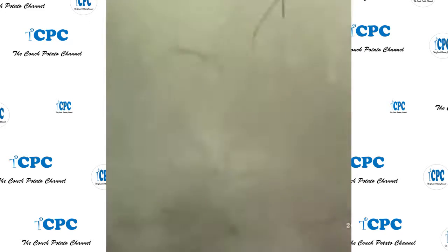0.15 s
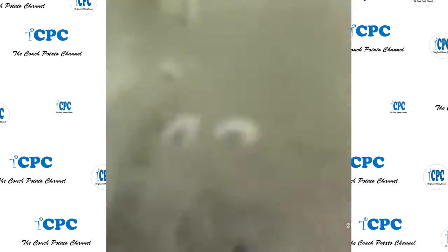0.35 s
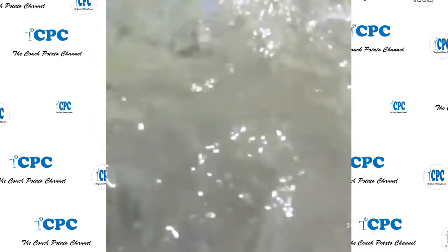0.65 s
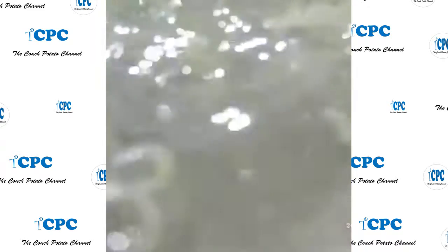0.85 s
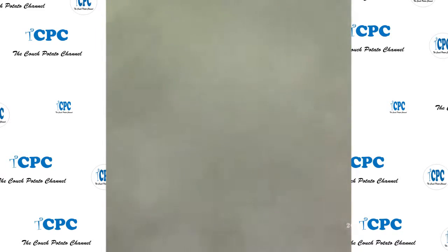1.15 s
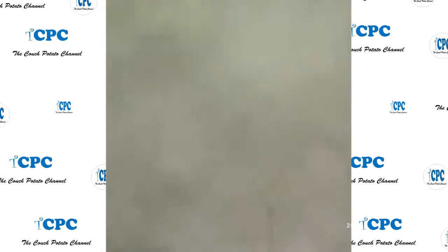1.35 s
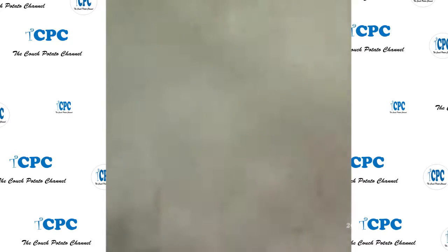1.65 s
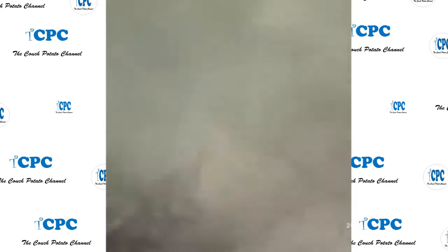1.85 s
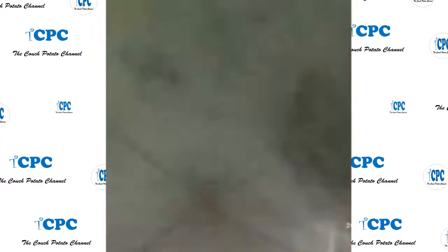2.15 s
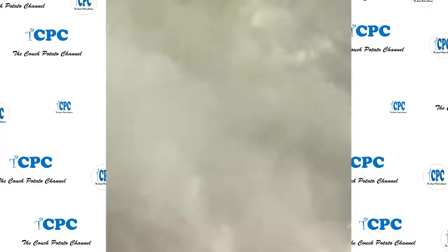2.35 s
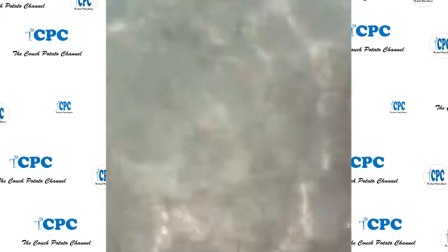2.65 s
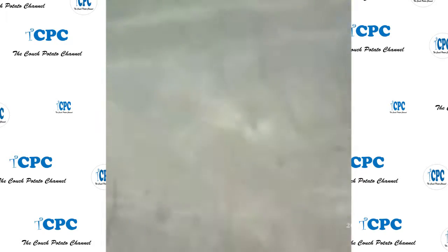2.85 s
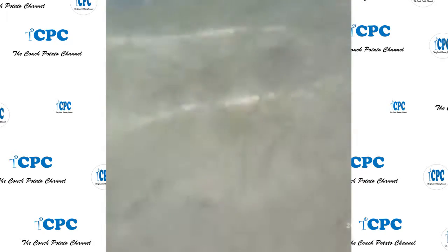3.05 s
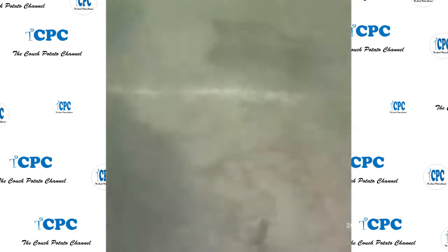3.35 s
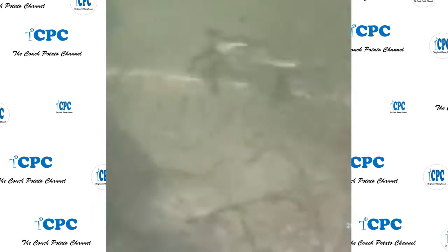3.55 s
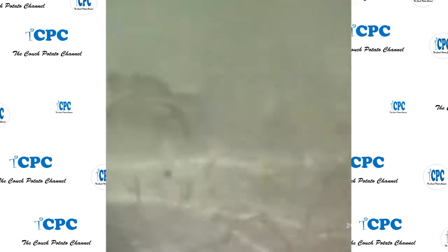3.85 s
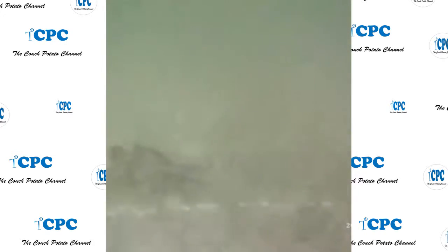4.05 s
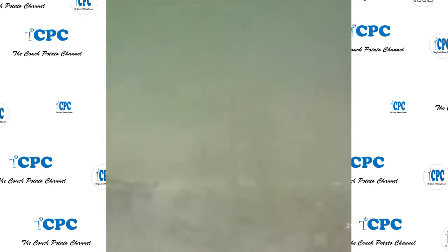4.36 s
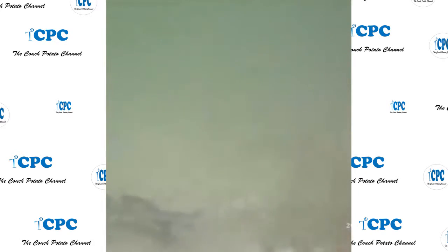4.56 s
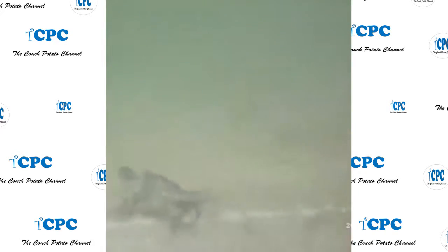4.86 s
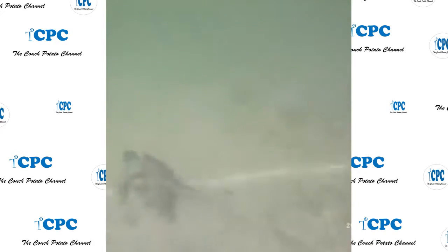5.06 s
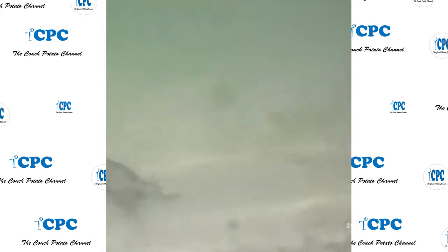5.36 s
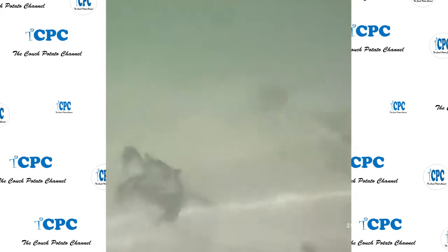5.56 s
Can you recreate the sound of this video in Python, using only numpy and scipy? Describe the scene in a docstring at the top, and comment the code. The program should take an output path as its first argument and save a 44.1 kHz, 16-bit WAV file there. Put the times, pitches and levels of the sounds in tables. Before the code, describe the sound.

A cased camera plunges in choppy shallow water: loud ringing bubbles, hollow plastic knocks and spitting splashes, thinning to faint plinks over dull hush.

```python
"""A camera in a sealed plastic case dips in and out of choppy shallow water.
First come close-packed washes: trapped air rings, knocks the shell and spits as it bursts. Among them
the case goes under, and a cloud of fine bubbles rushes by, its resonances sinking.
Three more groups of washes follow, with soft gurgling between; the nearest bubbles overload the microphone.
Late on the rings grow sparse and faint, and a last weak wash passes over a dull steady hush."""
import sys
import numpy as np
from scipy import signal
from scipy.fft import rfft, irfft
from scipy.io import wavfile
from scipy.ndimage import uniform_filter1d

SR = 44100
rng = np.random.default_rng(int(sys.argv[2]) if len(sys.argv) > 2 else 0)


def output_pcm(signal):
    """Save a mono or channel-first signal as 16-bit PCM at the path in sys.argv[1].

    Samples are clipped to [-1, 1] before scaling.
    """
    pcm = np.clip(np.atleast_2d(signal).T, -1, 1) * 32767
    wavfile.write(sys.argv[1], SR, np.round(pcm).astype(np.int16))


N = 251370
T = np.arange(N) / SR  # time in seconds

# big bubbles at the case: start_s, level_db, pitch_hz (at the start), ring_cycles (to fall 60 dB)
NEAR_BUBBLES = [(.0852, -5, 3940, 33), (.1306, -4.5, 3200, 50), (.1375, -6.5, 690, 4.2),
                (.1515, 1.5, 1642, 74), (.159, -10, 342, 11), (.1618, -0.5, 1357, 29),
                (.1767, 5.5, 860, 6.7), (.1891, 1, 1543, 38), (.2248, -2, 850, 13), (.23, -15.5, 477, 14),
                (.232, 3, 1538, 55), (.252, -7, 920, 17), (.2702, -7, 1120, 11), (.2993, -2, 3430, 47),
                (.3379, -11.5, 950, 5.3), (.3571, -6.5, 3800, 12), (.3685, 5.5, 1188, 55),
                (.4102, -1, 1780, 80), (.454, 3.5, 1692, 73), (.5984, -10.5, 1420, 20),
                (.983, -2, 2980, 7.9), (.9995, -4.5, 3420, 62), (1.0182, 1, 3260, 32),
                (1.0426, -5, 3220, 31), (1.1364, -7.5, 1960, 40), (1.203, -6, 1387, 44),
                (1.2244, -10.5, 1857, 100), (1.2355, -11, 1896, 70), (1.2629, -9, 1790, 20),
                (1.2917, -8.5, 2026, 30), (1.3636, -15, 2380, 37), (1.4052, 0.5, 1687, 17),
                (1.9714, -12.5, 1548, 80), (1.9869, -12, 1670, 29), (2.001, -5.5, 1340, 23),
                (2.0201, -12, 1560, 17), (2.0312, -3.5, 1640, 19), (2.0445, -12, 4190, 12),
                (2.0634, -12, 1647, 8.7), (2.0955, -10.5, 1010, 22), (2.097, -25.5, 384, 45),
                (2.122, -16, 1090, 18), (2.1918, -11, 1284, 20), (2.2252, -8.5, 1485, 18),
                (2.2346, -4, 2860, 24), (2.3051, -13.5, 1664, 55), (2.476, -3.5, 1960, 73),
                (2.478, -11, 1250, 107), (2.5285, -5, 1970, 36), (2.5598, -4.5, 4050, 73),
                (2.6149, -1, 2002, 55), (2.618, -1, 1264, 49), (2.6332, 3, 1687, 41), (2.64, -3, 3070, 59),
                (2.653, -7.5, 1370, 19), (2.6647, -6, 3370, 47), (3.1948, 2, 3075, 28),
                (3.228, -19.5, 567, 21), (3.2293, -1, 1930, 17.5), (3.2593, -11, 4110, 106),
                (3.2987, -7.5, 4130, 9.3), (3.3348, -15, 1300, 35), (3.4409, -15, 1031, 51),
                (3.4698, -17, 1610, 91), (3.5611, -13, 1700, 8.2), (3.6336, -14, 950, 27),
                (3.6622, -3.5, 894, 28), (3.8461, -8.5, 1520, 20), (3.8647, -15.5, 900, 39),
                (3.9102, -20.5, 1406, 53), (3.971, -33.5, 770, 32), (4.1619, -37.5, 881, 29),
                (4.4152, -19.5, 1556, 77), (4.4315, -13, 1620, 53), (4.503, -23, 1984, 27),
                (4.5854, -9, 1690, 46), (4.712, -38, 709, 68), (5.1838, -26, 797, 12),
                (5.2392, -27, 1110, 52), (5.2866, -30, 806, 37), (5.3127, -33, 1160, 47),
                (5.5568, -27.5, 950, 32)]
# ringing modes of the plastic shell: pitch_hz, t60_s, level_db (relative)
SHELL_MODES = [(445, 0.02, -17.5), (809, 0.019, -5.5), (1200, 0.045, -7), (1670, 0.032, 2),
               (1810, 0.013, 3.5), (3220, 0.0078, 6.5), (4065, 0.018, -5.5), (5460, 0.0098, -4)]
# films of water that burst on the case: start_s, level_db (tick, knock and splash are set against it)
SPRAY_BURSTS = [(.085, -7), (.161, -24), (0.189, -16), (.232, -19), (.402, -18), (0.4536, -10),
                (0.8669, -17.5), (0.982, -7), (1.0184, -33), (1.057, -3.5), (1.1034, -16), (1.1545, -8.5),
                (1.18, -21), (1.3255, -7), (1.3806, -4.5), (1.9782, -17), (2.0448, -16.5), (2.18, -21),
                (2.2056, -21), (2.5598, -16), (2.6342, -23), (2.7157, -7), (3.1948, -7), (3.2463, -5.5),
                (3.2987, -14), (3.431, -4.5), (3.4904, -5), (3.732, -31.5), (3.8461, -42), (4.162, -40),
                (4.4315, -33), (4.5854, -34.5), (4.94, -42), (5.101, -35), (5.1852, -31)]
# washes of water over the case: start_s, length_s, churn_db, spray_db, pitch_hz (typical bubble)
WASHES = [(.005, 0.066, -43.5, -54, 900), (0.082, .06, -23, -28, 2600), (.15, .06, -25, -42, 1000),
          (.25, 0.087, -36, -55, 1200), (0.365, .12, -22.5, -44.5, 1700), (0.552, .33, -47.5, -47.5, 1250),
          (.982, 0.025, -34.5, -37.5, 2480), (1.195, .22, -38, -52, 1900), (1.976, .06, -28, -60, 1400),
          (2.118, .14, -47.5, -62.5, 1400), (2.348, .33, -34.5, -58.5, 1600),
          (3.195, 0.074, -42, -40.5, 1650), (3.296, 0.082, -30.5, -46, 1590),
          (3.41, 0.075, -32, -38.5, 1400), (3.627, 0.045, -39, -80, 1100), (3.954, .17, -62, -85, 870),
          (5.256, .44, -51.5, -72, 1000)]
# level of the bubble cloud as the case goes under: time_s, level_db
PLUNGE_LEVEL = [(.40, -43), (.445, -28.5), (.51, -29), (.57, -35), (0.621, -44.5), (.8, -47.5), (.95, -72)]
# strong sinking resonances of the bubble cloud: start_s, length_s, start_hz, end_hz, level_db (peak)
SINKING_RESONANCES = [(.46, .12, 1080, 790, -29), (.495, .1, 1330, 860, -25), (.54, .08, 1480, 1060, -23),
                      (.46, .1, 1800, 1440, -26)]
# tone colour of the bubble cloud: freq_hz, level_db (relative)
CLOUD_COLOUR = [(200, -29), (700, -5), (1150, -2.5), (1700, -2.5), (2200, -0.5), (2650, 0.5), (3000, -9),
                (3580, 1.5), (4200, -9.5), (4800, -25), (6300, -20.5), (10500, -32), (13000, -71)]
# bright colour of fizz and ticks: freq_hz, level_db (relative)
SPRAY_COLOUR = [(1500, -25), (2600, -6.5), (3400, 4.5), (4200, 1), (4900, -3.5), (6000, 3), (7500, -4),
                (9500, -15.5), (12000, -21), (15500, -55.5)]
# rounder colour of murmur and splashes: freq_hz, level_db (relative)
SPLASH_COLOUR = [(120, -25.5), (330, -6.5), (600, 3.5), (880, 0.5), (1050, -6), (1630, 5.5), (2100, -7),
                 (2500, 1), (3300, -12.5), (4200, -17), (5000, -25), (12000, -64)]
# dull colour of the noise inside the case: freq_hz, level_db (relative)
HUSH_COLOUR = [(24, -58), (40, -50.5), (138, -21), (270, -10), (392, -4), (454, -4.5), (490, -5),
               (866, -3.5), (1320, -6), (1780, -5.5), (3650, -17), (7310, -35), (8070, -49.5),
               (8910, -35.5), (15000, -54.5)]

HUSH_DB = -56
TOP_HZ = 15400  # nothing much is heard above
WASH_ATTACK_S, CHURN_RELEASE_S, SPRAY_RELEASE_S = 0.0092, 0.027, 0.038  # time constants
DRAIN_DB, DRAIN_S = -20, .085  # slow trickle after a wash: level and time constant
CALM_CHURN_DB, CALM_SPRAY_DB = -65.5, -77.5  # lowest levels, between washes
POPS_PER_S = 32  # small bubbles that reach the case during a wash
SPITS_PER_S = 45  # small bursts of spray, during a wash and its drips
DRIP_S = 0.14  # bursts go on this long after a wash


def bubbles(rows, knock_db=-8, damped_db=2, tick_db=-31, tick_db_per_octave=10, tick_t60_s=0.017,
            splash_db=-12, splash_t60_s=.055, daughter_db=-20, daughter_db_per_db=2.0):
    """Bubbles right at the case: each gives a ring, a knock on the shell, a rough splash and a wet tick."""
    out, ticks, splashes = np.zeros(N), np.zeros(N), np.zeros(N)
    for start_s, level_db, pitch_hz, cycles in rows:
        t60_s = cycles / pitch_hz
        # long rings also take longer to swell
        ring = bubble(pitch_hz, t60_s, rise=0.063, swell_s=0.00083 + .04 * t60_s)
        add(out, start_s, undb(level_db) * ring)
        # a bubble pressed against the shell rings for fewer cycles and knocks harder
        shell_db = level_db + knock_db + damped_db * np.log2(40 / cycles)
        # big, low bubbles excite mainly the low modes
        blow = knock(scatter_db=5, detune=0.039, corner_hz=1.54 * pitch_hz)
        add(out, start_s + .0005, undb(shell_db) * blow)
        add(splashes, start_s - .0005, undb(shell_db + splash_db) * hiss(splash_t60_s))
        # the smaller the bubble, the stronger its tick
        sharp_db = level_db + tick_db + tick_db_per_octave * np.log2(pitch_hz / 1700)
        add(ticks, start_s - .0005, undb(sharp_db) * hiss(tick_t60_s))
        # only violent bubbles shed loud daughters
        add(out, start_s, daughters(daughter_db + daughter_db_per_db * level_db))
    return out + colour(ticks, SPRAY_COLOUR) + colour(splashes, SPLASH_COLOUR)


def small_bubbles(above_churn_db=9, range_db=11, octaves=1.3, cycles=45):
    """Rows of small bubbles that each wash carries to the case at random, louder in rougher water."""
    rows = []
    chances = rng.random((len(WASHES), 60, 4))
    for (start_s, length_s, churn_db, _, pitch_hz), chance in zip(WASHES, chances):
        for when, strength, size, damping in chance[:int(POPS_PER_S * length_s)]:
            level_db = churn_db + above_churn_db + range_db * strength
            own_hz = pitch_hz * 2 ** (octaves * (size - .4))
            rows.append((start_s + length_s * when, level_db, own_hz, cycles * (.5 + damping)))
    return rows


def bubble(pitch_hz, t60_s, rise, swell_s):
    """A pinched-off bubble swells into a decaying ring; a positive rise lifts the pitch as it nears the surface."""
    t = T[:int((t60_s + 2 * swell_s) * SR) + 2]
    gliding_hz = pitch_hz * (1 + rise * t / t60_s)
    phase = 2 * np.pi * np.cumsum(gliding_hz) / SR
    onset = np.sin(np.pi / 2 * np.minimum(t / swell_s, 1)) ** 2
    return onset * fade(np.maximum(t - swell_s, 0), t60_s) * np.sin(phase)


def knock(scatter_db, detune, corner_hz):
    """The shell rings briefly, dull above the corner; the water on it shifts its modes from blow to blow."""
    t = T[:SR // 20]
    ring = 0
    draws = rng.standard_normal((len(SHELL_MODES), 3))
    for (mode_hz, t60_s, level_db), (strength, shift, polarity) in zip(SHELL_MODES, draws):
        dulling = np.sqrt(1 + (mode_hz / corner_hz) ** 6)
        gain = np.sign(polarity) * undb(level_db + scatter_db * strength) / dulling
        tone = np.sin(2 * np.pi * mode_hz * (1 + detune * shift) * t)
        ring = ring + gain * fade(t, t60_s) * tone
    ring = ring * (1 - np.exp(-t / 0.00037)) ** 2  # soft edge
    return ring / np.abs(ring).max()


def daughters(level_db, fall_db=8, t60_s=0.031):
    """Four tiny bubbles split off within 25 ms; later ones are weaker and higher ones die sooner."""
    out = np.zeros(SR // 8)
    for late, size in rng.random((4, 2)):
        ring = bubble(1300 * 3.4 ** size, t60_s / 2 ** size, rise=.05, swell_s=.001)
        i = int(.025 * late * SR)
        out[i:i + len(ring)] += undb(level_db - fall_db * late) * ring
    return out


def spits(rows, tick_db=-6, tick_t60_s=.016, knock_db=-7, splash_db=-18, splash_t60_s=0.11, daughter_db=-14):
    """A film of water bursts on the case: a bright tick, a light knock, a splash and a few tiny bubbles."""
    out, ticks, splashes = np.zeros(N), np.zeros(N), np.zeros(N)
    for start_s, level_db in rows:
        add(ticks, start_s - .0005, undb(level_db + tick_db) * hiss(tick_t60_s))
        add(splashes, start_s, undb(level_db + splash_db) * hiss(splash_t60_s))
        blow = knock(scatter_db=6, detune=0.018, corner_hz=3300)
        add(out, start_s + 0.00032, undb(level_db + knock_db) * blow)
        add(out, start_s, daughters(level_db + daughter_db))
    return out + colour(ticks, SPRAY_COLOUR) + colour(splashes, SPLASH_COLOUR)


def small_spits(above_spray_db=14, range_db=15, drip_db=-12):
    """Rows of small bursts that crackle at random through each wash and, more faintly, after it."""
    rows = []
    chances = rng.random((len(WASHES), 60, 2))
    for (start_s, length_s, _, spray_db, _), chance in zip(WASHES, chances):
        span_s = length_s + DRIP_S
        for when, strength in chance[:int(SPITS_PER_S * span_s)]:
            late_s = span_s * when
            dripping = late_s > length_s
            fall_db = drip_db * dripping * (1 + (late_s - length_s) / DRIP_S)
            level_db = spray_db + above_spray_db + range_db * strength ** 2 + fall_db
            rows.append((start_s + late_s, level_db))
    return rows


def hiss(t60_s):
    """A puff of noise with a soft edge."""
    t = T[:SR // 16]
    return rng.standard_normal(len(t)) * (1 - np.exp(-t / 0.0009)) * fade(t, t60_s)


def wash(gurgle_db=-1, murmur_db=-6, fizz_db=1, sing=9.2):
    """Moving water stirs bubbles, sets the shell murmuring and fizzes where it breaks."""
    churn, spray = undb(CALM_CHURN_DB), undb(CALM_SPRAY_DB)
    for start_s, length_s, churn_db, spray_db, _ in WASHES:
        churn = np.maximum(churn, undb(churn_db) * surge(start_s, length_s, CHURN_RELEASE_S))
        spray = np.maximum(spray, undb(spray_db) * surge(start_s, length_s, SPRAY_RELEASE_S))
    # the typical pitch glides from the middle of one wash to the next
    pitch_hz, = curves([(start_s + length_s / 2, hz) for start_s, length_s, _, _, hz in WASHES])
    gurgle = swarm(pitch_hz, count=2200, spread=.13, cycles=42, scatter_db=4.5)
    murmur = colour(swarm(pitch_hz, count=3000, spread=.27, cycles=20, scatter_db=3), SPLASH_COLOUR)
    # a narrow resonance sings along
    singing = signal.lfilter(*signal.iirpeak(1635, 22, fs=SR), murmur)
    murmur = unit(murmur + sing * singing)
    fizz = swarm(np.full(N, 5800.), count=7000, spread=0.27, cycles=18, scatter_db=9.0)
    fizz = unit(colour(fizz, SPRAY_COLOUR))
    return churn * (undb(gurgle_db) * gurgle + undb(murmur_db) * murmur) + spray * undb(fizz_db) * fizz


def surge(start_s, length_s, release_s):
    """A wash swells up to its start, holds, drops quickly and then trickles away."""
    after_s = np.maximum(T - start_s - length_s, 0)
    trickle = undb(DRAIN_DB) * np.exp(-after_s / DRAIN_S)
    release = np.maximum(np.exp(-after_s / release_s), trickle)
    return np.exp(np.minimum(T - start_s, 0) / WASH_ATTACK_S) * release


def swarm(pitch_hz, count, spread, cycles, scatter_db):
    """Many small bubbles further off, of scattered size and strength."""
    out = np.zeros(N)
    for when, size, strength, damping in rng.random((count, 4)):
        # most lie near the given pitch, none beyond an octave from it
        hz = pitch_hz[int(when * N)] * np.clip((size / (1 - size)) ** spread, .5, 2)
        level_db = -scatter_db * np.log(strength + 0.063)  # a few stand out
        ring = bubble(hz, cycles * (.5 + damping) / hz, rise=.07, swell_s=2 / hz)
        add(out, when * N / SR, undb(level_db) * ring)
    return unit(out)


def plunge(flutter=0.12, glide_db=0, rush_db=-3):
    """A cloud of fine bubbles rushes as the case goes under; its resonances slide down as it spreads."""
    level_db, = curves(PLUNGE_LEVEL)
    begin_s, end_s = PLUNGE_LEVEL[0][0], PLUNGE_LEVEL[-1][0]
    during = (T > begin_s) & (T < end_s)
    # many short resonances sink, the early ones faster than the late ones
    glides = np.zeros(N)
    for when, size in rng.random((260, 2)):
        sink = -.3 * (1 - when) ** 2 / (1 + 3 * size)
        glide = bubble(700 + 3600 * size, .1, rise=sink, swell_s=.02)
        add(glides, begin_s + (end_s - begin_s) * when, glide)
    glides = colour(glides, CLOUD_COLOUR)
    glides = glides / glides[during].std()
    rush = unit(colour(rng.standard_normal(N), CLOUD_COLOUR))
    out = undb(level_db) * during * (undb(glide_db) * glides + undb(rush_db) * rush)
    for start_s, length_s, start_hz, end_hz, slide_db in SINKING_RESONANCES:
        n = int(length_s * SR)
        phase = 2 * np.pi * np.cumsum(np.geomspace(start_hz, end_hz, n)) / SR
        # the turbulence that feeds a strong resonance shakes its level and phase
        in_step, out_of_step = flutter * slow_noise(n), flutter * slow_noise(n)
        tone = (1 + in_step) * np.sin(phase) + out_of_step * np.cos(phase)
        swell = np.sin(np.linspace(0, np.pi, n))
        add(out, start_s, undb(slide_db) * swell * tone)
    return out


def slow_noise(n):
    """Slow random wander: noise averaged twice over 300 samples."""
    smooth = uniform_filter1d(uniform_filter1d(rng.standard_normal(SR // 2), 300), 300)
    return unit(smooth)[:n]


def hush(whine_db=-79):
    """Dull steady noise inside the case, with a thin high whine made of narrow-band noise."""
    band = signal.butter(2, [7780, 7940], "bandpass", fs=SR, output="sos")
    whine = signal.sosfilt(band, rng.standard_normal(N))
    noise = colour(rng.standard_normal(N), HUSH_COLOUR)
    return undb(HUSH_DB) * unit(noise) + undb(whine_db) * unit(whine)


def undb(db):
    """Decibels to gain."""
    return 10 ** (np.asarray(db) / 20)


def unit(x):
    """Scale to rms 1."""
    return x / np.sqrt(np.mean(x ** 2))


def fade(t, t60_s):
    """Free decay, down 60 dB after t60_s."""
    return np.exp(-np.log(1000) * t / t60_s)


def curves(table):
    """Every column of a table of timed rows, sample by sample."""
    time_s, *columns = np.transpose(table)
    return [np.interp(T, time_s, column) for column in columns]


def add(out, start_s, sound):
    """Mix a sound in at its start time."""
    i = int(np.clip(start_s * SR, 0, N))
    out[i:i + len(sound)] += sound[:N - i]


def colour(x, points):
    """Causal minimum-phase filter through points of freq_hz, level_db."""
    freq_hz, level_db = np.transpose(points)
    f = np.fft.rfftfreq(2048, 1 / SR)
    gain = undb(np.interp(np.log(f + 1), np.log(freq_hz), level_db))
    # fold the cepstrum forward in time, so that nothing sounds early
    cepstrum = irfft(np.log(gain))
    half = len(cepstrum) // 2
    cepstrum[1:half] *= 2
    cepstrum[half + 1:] = 0
    impulse = irfft(np.exp(rfft(cepstrum)))
    return signal.fftconvolve(x, impulse)[:len(x)]


def scene(low_hz=190):
    """The water is heard through the case, which passes little bass, by one microphone."""
    case = signal.butter(3, low_hz, "highpass", fs=SR, output="sos")
    floor = hush()
    water = wash() + plunge()
    water = water + spits(SPRAY_BURSTS + small_spits())
    water = water + bubbles(NEAR_BUBBLES + small_bubbles())
    return (signal.sosfilt(case, water) + floor)[None]


def record(dry):
    """The microphone flattens the loudest rings at full scale; bass and treble roll off and the top is cut."""
    clipped = dry / (1 + dry ** 8) ** (1 / 8)
    thin = signal.sosfilt(signal.butter(2, 115, "highpass", fs=SR, output="sos"), clipped)
    dull = signal.sosfilt(signal.butter(3, 10000, fs=SR, output="sos"), thin)
    return signal.sosfilt(signal.ellip(8, .2, 70, TOP_HZ, fs=SR, output="sos"), dull)


dry = scene()
out = record(dry)
output_pcm(out)
```